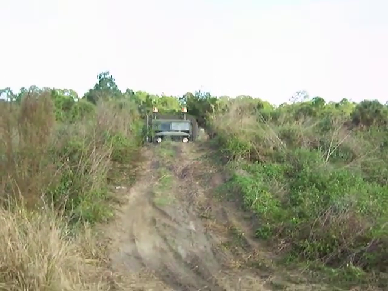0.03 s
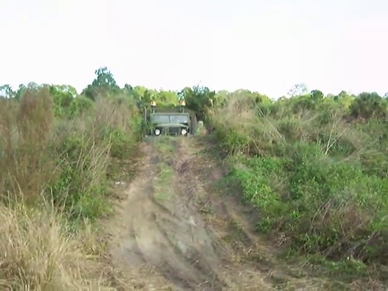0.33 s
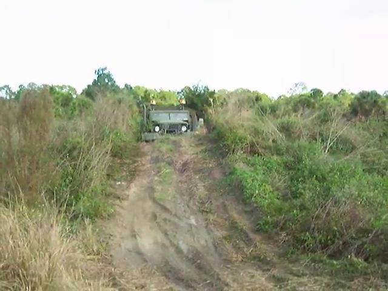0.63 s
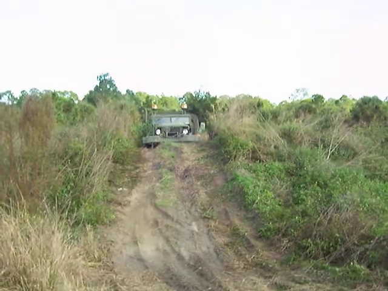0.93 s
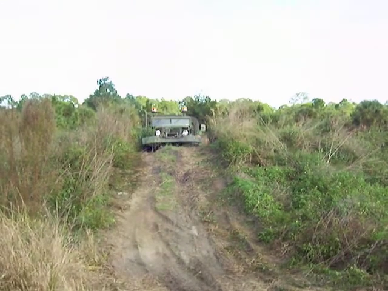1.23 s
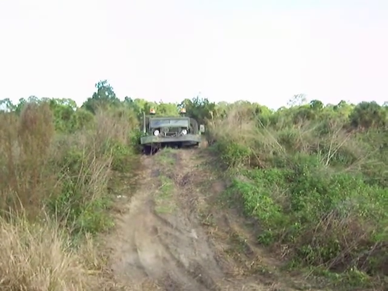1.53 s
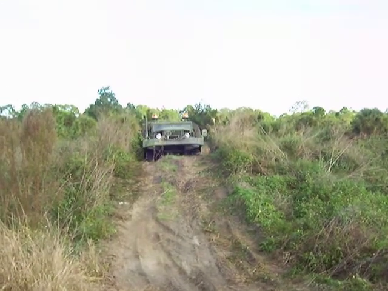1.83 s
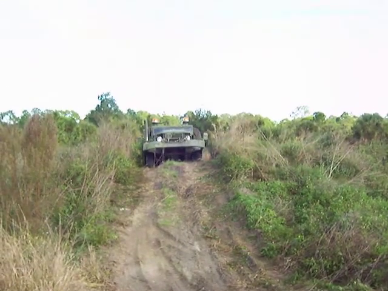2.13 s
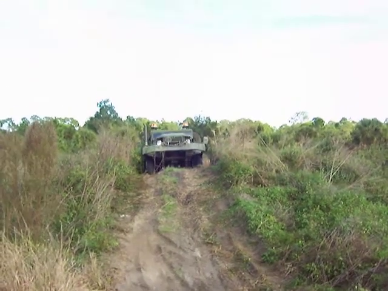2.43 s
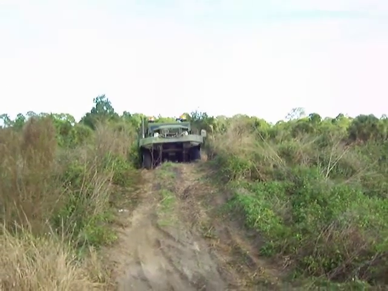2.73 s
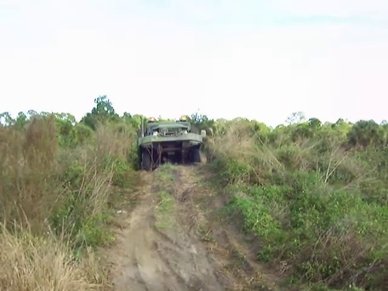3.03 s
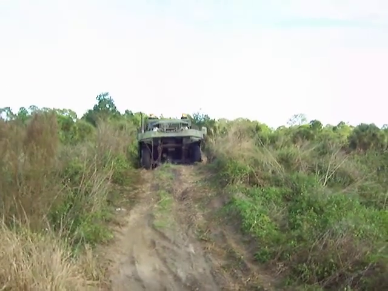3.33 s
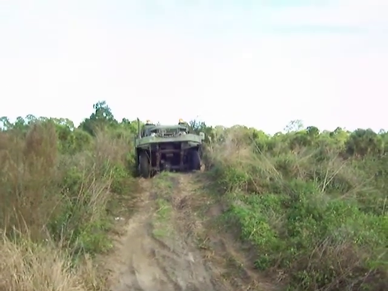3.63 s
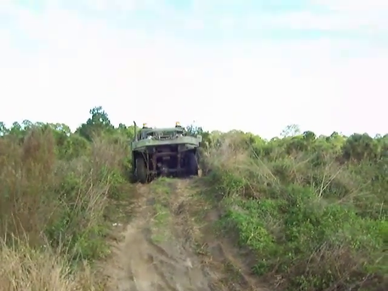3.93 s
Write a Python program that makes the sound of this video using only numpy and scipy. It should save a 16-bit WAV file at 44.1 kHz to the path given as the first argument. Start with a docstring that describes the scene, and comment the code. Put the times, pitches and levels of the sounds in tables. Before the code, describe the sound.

A heavy diesel truck crawls along a dirt track outdoors, its exhaust thumping under a high, fluttering turbo whistle. The engine eases, loose metal clacks a few times, then it pulls harder and louder as it nears.

```python
"""A heavy six-cylinder diesel truck crawls over a rise on a dirt track and comes slowly nearer.
From the start, over a tyre rumble, each firing thumps and rasps out of the exhaust stack, rattles
the block and blows a chirp of turbo whistle. The engine slows through the first second; loose metal
clacks at 0.8 s and three times near 2 s. Then the engine takes load and picks up speed: the whistle
climbs, and the exhaust barks louder as the truck tops the rise."""
import sys
import numpy as np
from scipy import signal
from scipy.fft import rfft, irfft, next_fast_len
from scipy.io import wavfile
from scipy.ndimage import map_coordinates

SR = 44100
rng = np.random.default_rng(int(sys.argv[2]) if len(sys.argv) > 2 else 0)


def output_pcm(signal):
    """Save a mono or channel-first signal as 16-bit PCM at the path in sys.argv[1].

    Samples are clipped to [-1, 1] before scaling.
    """
    pcm = np.clip(np.atleast_2d(signal).T, -1, 1) * 32767
    wavfile.write(sys.argv[1], SR, np.round(pcm).astype(np.int16))


N = 176400

# Cylinders in firing order. Each row: thump weight in dB, lateness in firing periods, knock weight
# in dB. The exhaust thump scales the first two by its unevenness.
CYLINDER_TRAITS = [(-0.04, 0.0062, -7.5), (-7, -0.024, -7.5), (-0.2, 0.025, -5), (-3.2, -0.016, -5),
                   (-2.8, 0.0015, -10.5), (-2.4, -0.025, -8.5)]


def amp(db):
    """Decibels to gain."""
    return 10 ** (np.asarray(db) / 20)


def unit(x):
    """Scale to rms 1."""
    return x / np.sqrt(np.mean(x ** 2) + 1e-20)


def curves(rows):
    """One value per sample for each column after the time."""
    times_s, *columns = np.transpose(rows)
    return [np.interp(np.arange(N) / SR, times_s, column) for column in columns]


def wobble(knots_per_s):
    """Smooth random curve."""
    at = np.arange(N) * knots_per_s / SR
    return map_coordinates(rng.standard_normal(8192), [at], mode="wrap")


def filtered(x, response):
    """Apply a complex frequency response."""
    size = next_fast_len(N + SR // 2)
    return irfft(rfft(x, size) * response(np.fft.rfftfreq(size, 1 / SR)), size)[:N]


def gain(points, hz):
    """Gain of (Hz, dB) points on a log axis."""
    points_hz, db = np.transpose(points)
    return amp(np.interp(np.log(hz + 1), np.log(points_hz + 1), db))


def coloured(x, points):
    """Filter by (Hz, dB) points, then scale to rms 1."""
    return unit(filtered(x, lambda hz: gain(points, hz)))


def noise():
    """Fresh white noise."""
    return rng.standard_normal(N)


def puffs(firings, at, width, cylinder_db, scatter_db):
    """One bell-shaped swell per firing, sized by cylinder and chance; at, width in firing periods."""
    nearest = np.round(firings - at).astype(int)
    size = amp(np.resize(cylinder_db, 600) + scatter_db * rng.standard_normal(600))
    neighbours = (nearest - 1, nearest, nearest + 1)
    return sum(size[k] * np.exp(-.5 * ((firings - at - k) / width) ** 2) for k in neighbours)


def turbulence(firings, repeat_db):
    """Noise, part of which repeats every engine cycle."""
    cycle = rng.standard_normal(4400)
    position = firings / len(CYLINDER_TRAITS) % 1
    return noise() + amp(repeat_db) * cycle[(position * len(cycle)).astype(int)]


def rumble():
    """Tyres and chassis rumble evenly over the ruts."""
    # Each row: frequency in Hz, gain in dB.
    spectrum = [(12, -19), (30, 2), (60, -0.5), (110, 2), (170, -2), (260, -13.5), (400, -34.5),
                (800, -59.5)]
    return amp(-32.5) * coloured(noise(), spectrum)


def brush_echo(x, level_db=-14, t60_s=0.046):
    """Brush beside the track scatters a short, diffuse echo."""
    t = np.arange(SR // 4) / SR
    tail = rng.standard_normal(len(t)) * amp(-60 * t / t60_s)
    return amp(level_db) * signal.fftconvolve(x, tail / np.linalg.norm(tail))[:N]


def loose_metal(t60_s=0.07):
    """Loose metal on the chassis clacks as the truck jolts."""
    # Each row: start in seconds, peak level in dB.
    clacks = [(0.82, -31.5), (1.954, -30), (2.162, -34.5), (2.197, -28)]
    spectrum_hz_db = [(400, -22), (900, 5.5), (2300, 0.5), (4000, -14.5), (8000, -35.5)]
    t = np.arange(N) / SR
    envelope = sum(amp(db - 60 * np.abs(t - start_s) / t60_s) * (t >= start_s) for start_s, db in clacks)
    return envelope * coloured(noise(), spectrum_hz_db)


def block_clatter(firings, trim_db=-0.5):
    """The block's resonances rattle in step with the firings."""
    # Each row: time in seconds, level in dB before trim.
    levels = [(0, -42.5), (.6, -42), (1.3, -40), (1.9, -39), (2.6, -36.5), (3, -35.5), (3.3, -32.5),
              (3.5, -37.5), (4, -31)]
    # Each row: frequency in Hz, gain in dB.
    resonances = [(1200, -35), (1500, -11), (1590, -8.5), (1790, 1.5), (2000, -6.5), (2235, 6),
                  (2430, -6.5), (2615, 3), (2900, -9.5), (3090, -2), (3320, -9), (3520, -5.5),
                  (3750, -11.5), (4800, -48)]
    knock_db = np.array(CYLINDER_TRAITS)[:, 2]
    drive = turbulence(firings, repeat_db=-9.5)
    drive *= .8 + puffs(firings, at=0.63, width=0.2, cylinder_db=knock_db, scatter_db=3.0)
    return amp(curves(levels)[0] + trim_db) * coloured(drive, resonances)


def gas_hiss(firings, trim_db=2):
    """Gas hisses, with an irregular spurt at each firing."""
    # Each row: time in seconds, level in dB before trim.
    levels = [(0, -47), (.5, -46.5), (1.3, -48), (2, -45), (2.5, -42.5), (3, -43), (4, -40.5)]
    # Each row: frequency in Hz, gain in dB.
    spectrum = [(2800, -16.5), (3600, 11.5), (4400, 10), (5000, 3.5), (5900, 0.5), (6600, 2.5), (6830, -2),
                (6930, -16), (7050, 1), (7600, -6), (8200, -12.5), (8800, -36.5)]
    knock_db = np.array(CYLINDER_TRAITS)[:, 2]
    hiss = noise() * amp(wobble(300))
    hiss *= 2 + puffs(firings, at=0.64, width=0.098, cylinder_db=knock_db, scatter_db=6.5)
    return amp(curves(levels)[0] + trim_db) * coloured(hiss, spectrum)


def turbo_whistle(firings, surge_hz=437, flutter_hz=35.7, drift_hz=30, flicker_db=2.5, trim_db=-0.5):
    """Each puff swells the whistle and bends it up; it slides back onto a steady tone."""
    # Each row: time in seconds, level in dB before trim, loudest moment in firing periods,
    # weight of the steady tone.
    shape = [(0, -38, 0.77, 0.29), (.35, -40.5, 0.73, 0.22), (.62, -43, 0.69, 0.073),
             (1.05, -41, 0.45, 0.034), (1.25, -40, .58, .03), (1.42, -37, .64, .03),
             (1.7, -36.5, 0.65, 0.057), (1.87, -41.5, 0.76, .03), (2.05, -38, .6, 0.037),
             (2.3, -37.5, 0.83, .1), (2.55, -36, 0.77, 0.29), (2.8, -40.5, .68, 0.067),
             (3.1, -38.5, 0.73, 0.082), (3.42, -37, 0.7, 0.25), (3.6, -34, 0.91, 0.24), (4, -30, .78, 0.14)]
    # Pitch between puffs. Each row: time in seconds, frequency in Hz.
    rest_pitch = [(0, 3920), (.4, 3800), (.75, 3680), (1.05, 3780), (1.45, 3700), (1.7, 3660), (2.05, 3860),
                  (2.6, 3960), (2.8, 3930), (3.1, 4060), (3.55, 4190), (4, 4350)]
    level_db, loudest, steady = curves(shape)
    rest_hz, = curves(rest_pitch)
    push_db = 0.64 * np.array(CYLINDER_TRAITS)[:, 0]
    surge = puffs(firings, at=0.498, width=0.13, cylinder_db=[0], scatter_db=1.36)
    chirp_hz = rest_hz + surge_hz * surge + flutter_hz * wobble(450)
    swell = 0.12 + puffs(firings, at=loudest, width=0.18, cylinder_db=push_db, scatter_db=1.5)
    flicker = amp(flicker_db * wobble(500))
    chirps = swell * flicker * np.sin(2 * np.pi * np.cumsum(chirp_hz) / SR)
    tone_hz = rest_hz + drift_hz * wobble(120)
    tone = steady * (.5 + swell) * np.sin(2 * np.pi * np.cumsum(tone_hz) / SR)
    return amp(level_db + trim_db) * unit(chirps + tone)


def stack_rasp(firings, rasp_trim_db=-1.5, growl_trim_db=1.5):
    """Puffs of turbulent gas ring the stack: a rasp in its lower resonances, a growl in the upper."""
    # Each row: time in seconds, level in dB before trim.
    rasp_levels = [(0, -34), (1.2, -33.5), (1.8, -34), (2.4, -29), (3, -31), (3.6, -30.5), (4, -27.5)]
    growl_levels = [(0, -39), (1, -37), (1.6, -36), (2, -33), (2.2, -33.5), (2.8, -33), (3.05, -35.5),
                    (3.3, -31), (3.5, -34), (4, -30)]
    # Each row: frequency in Hz, gain in dB.
    lower_resonances = [(150, -29.5), (220, -14), (275, -22), (320, -4.5), (415, -7), (460, 1.5), (545, 2),
                        (605, -1), (680, -5.5), (750, -10.5), (900, -54)]
    upper_resonances = [(600, -15), (740, -12.5), (800, -3), (895, 2), (1010, 0.5), (1110, -3.5),
                        (1230, -11), (1330, -6), (1440, -8), (1550, -22), (1900, -53)]
    knock_db = np.array(CYLINDER_TRAITS)[:, 2]
    long_puffs = turbulence(firings, repeat_db=-2.5)
    long_puffs *= .5 + puffs(firings, at=0.5, width=0.32, cylinder_db=knock_db, scatter_db=0.4)
    short_puffs = turbulence(firings, repeat_db=-2.5)
    short_puffs *= .5 + puffs(firings, at=0.78, width=0.13, cylinder_db=knock_db, scatter_db=1.5)
    rasp = amp(curves(rasp_levels)[0] + rasp_trim_db) * coloured(long_puffs, lower_resonances)
    growl = amp(curves(growl_levels)[0] + growl_trim_db) * coloured(short_puffs, upper_resonances)
    return rasp + growl


def exhaust_thump(firings, at_periods=0.58, jitter_periods=0.009, scatter_db=0.4, thump_trim_db=-0.5):
    """Each firing expels a slug of gas and the pipe sucks back after it; its sharp edge barks."""
    # Each row: time in seconds, factor on the differences between cylinders.
    unevenness = [(0, 2.4), (.45, 1.1), (.8, 0.55), (1.5, .6), (2.1, 0.92), (2.4, 1), (2.9, 0.81),
                  (3.4, 0.71), (4, 1.4)]
    # Each row: time in seconds, level in dB (the thump's before trim).
    thump_levels = [(0.0, -26.5), (0.03, -26), (0.75, -22.5), (2.75, -20), (3.2, -21), (3.31, -20),
                    (3.98, -20), (4.0, -21)]
    bark_levels = [(0, -45.5), (.8, -55), (1.7, -58), (2.4, -44.5), (2.8, -45.5), (3.4, -41), (4, -36)]
    # Each row: frequency in Hz, gain in dB.
    muffler = [(15, -18.5), (30, -6), (60, 8.5), (90, 14.5), (120, 9.5), (150, 4), (180, 1.5), (215, -29),
               (250, -16.5), (400, -26), (700, -83)]
    bark_spectrum = [(170, -47), (215, -19.5), (250, 6.5), (310, 3), (370, 2.5), (450, -7.5), (550, -9.5),
                     (750, -30.5), (1200, -56)]
    k = np.arange(int(firings[-1]) + 1)
    uneven = np.interp(k, firings, curves(unevenness)[0])
    size_db, late_periods, _ = uneven * np.array(CYLINDER_TRAITS)[k % len(CYLINDER_TRAITS)].T
    jitter, scatter = rng.standard_normal((len(k), 2)).T
    onset_periods = k + at_periods + late_periods + jitter_periods * jitter
    onset_samples = np.interp(onset_periods, firings, np.arange(N), right=N).astype(int)
    pulses = np.bincount(onset_samples, amp(size_db + scatter_db * scatter), N + 1)[:N]
    push_pull = unit(filtered(pulses, lambda hz: 1j * gain(muffler, hz)))  # 90 degree phase shift
    thump = amp(curves(thump_levels)[0] + thump_trim_db) * push_pull
    bark = amp(curves(bark_levels)[0]) * coloured(pulses, bark_spectrum)
    return thump + bark


def scene():
    """The crankshaft times the engine layers; only the brighter sounds echo."""
    # Each row: time in seconds, firings per second.
    engine_speed = [(0.0, 63.44), (0.2, 61.92), (0.4, 61.11), (0.6, 58.37), (0.85, 57.49), (1.1, 58.43),
                    (1.4, 58.06), (1.7, 58.05), (2.0, 58.42), (2.25, 58.99), (2.5, 60.68), (2.8, 61.07),
                    (3.05, 61.83), (3.3, 61.69), (3.5, 60.69), (3.7, 61.73), (3.85, 62.72), (4.0, 63.13)]
    firing_hz, = curves(engine_speed)
    firings = np.cumsum(firing_hz) / SR
    bright = stack_rasp(firings) + block_clatter(firings) + gas_hiss(firings)
    bright += turbo_whistle(firings) + loose_metal()
    return (exhaust_thump(firings) + rumble() + bright + brush_echo(bright))[None]


def record(dry, cutoff_hz=8840):
    """Brick-wall low-pass."""
    return filtered(dry[0], lambda hz: hz < cutoff_hz)[None]


dry = scene()
out = record(dry)
output_pcm(out)
```